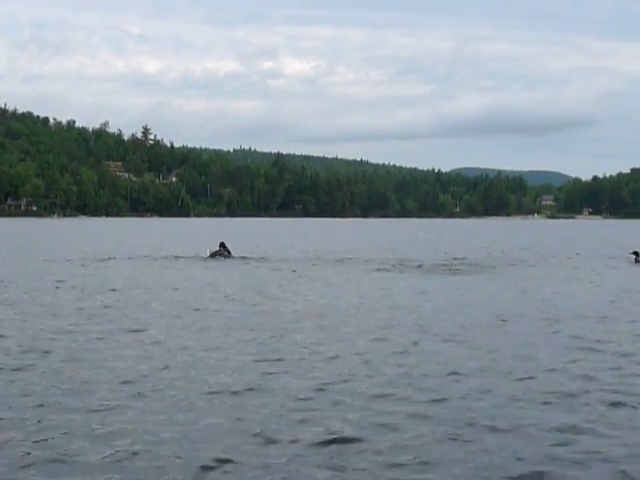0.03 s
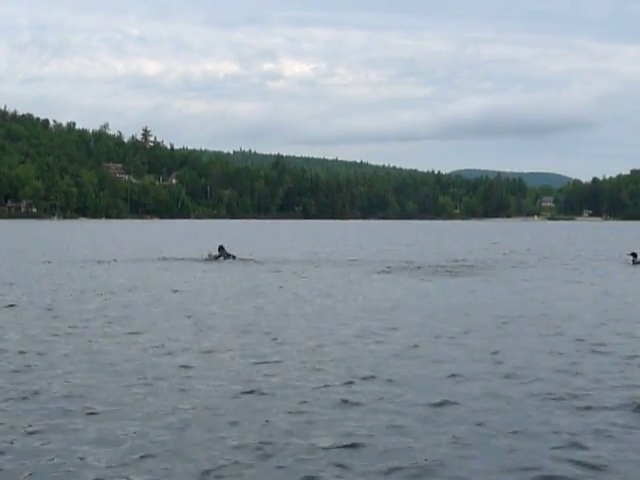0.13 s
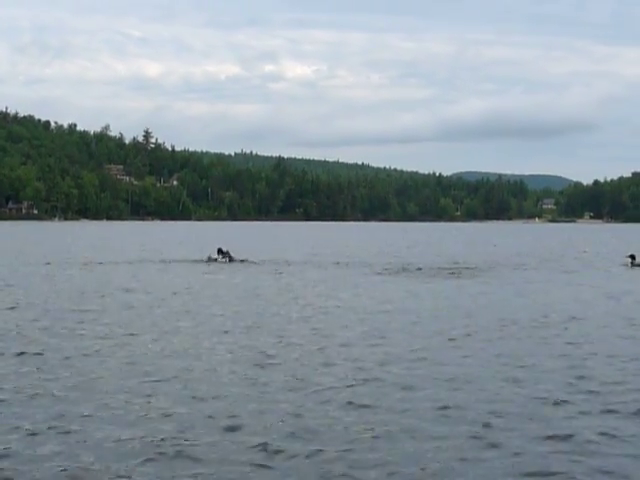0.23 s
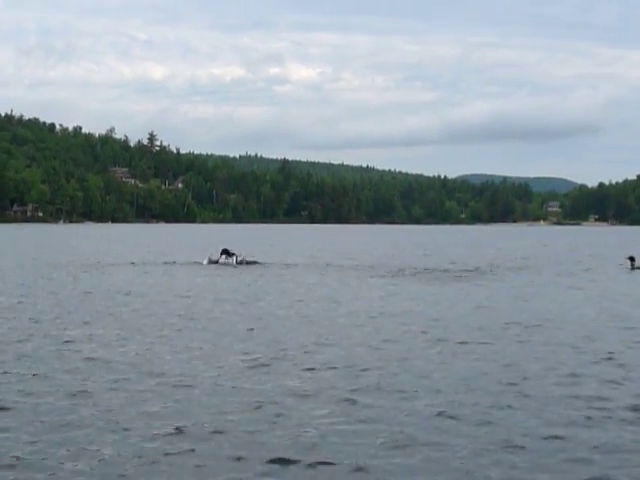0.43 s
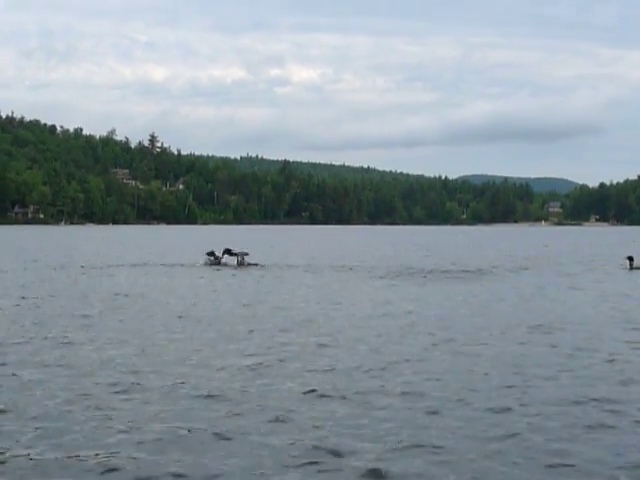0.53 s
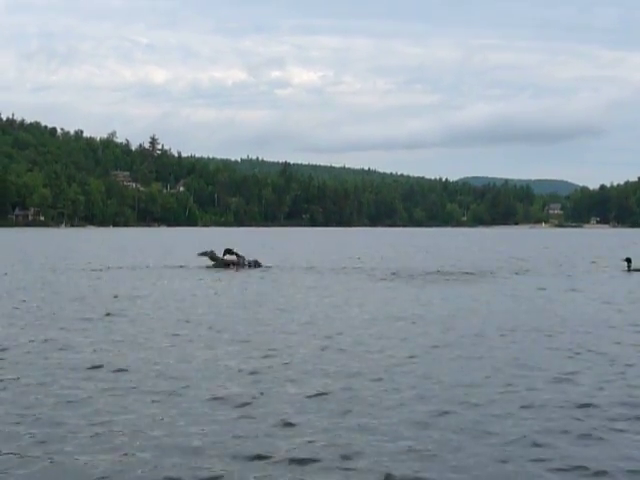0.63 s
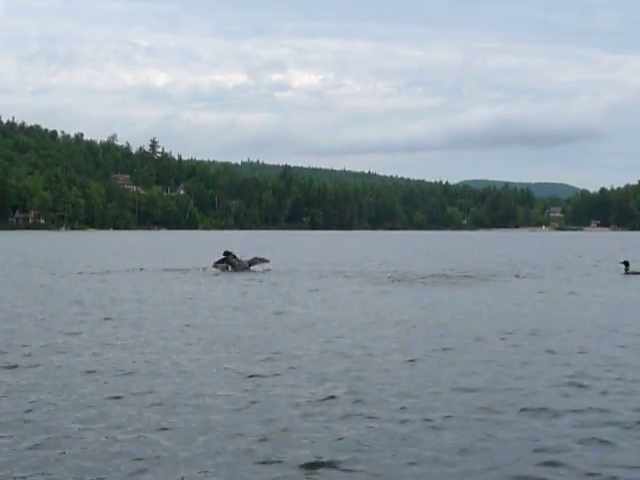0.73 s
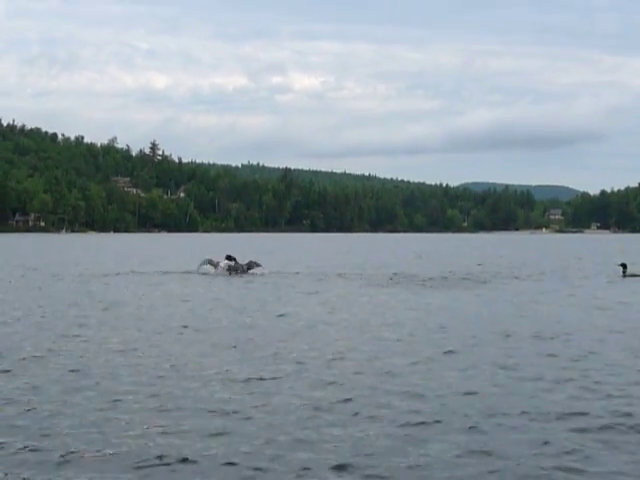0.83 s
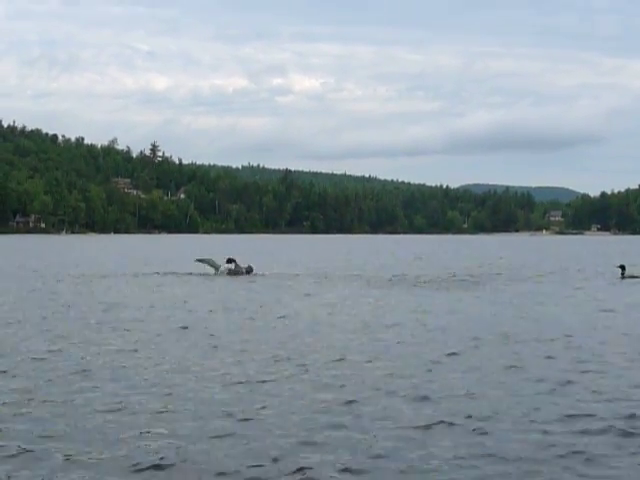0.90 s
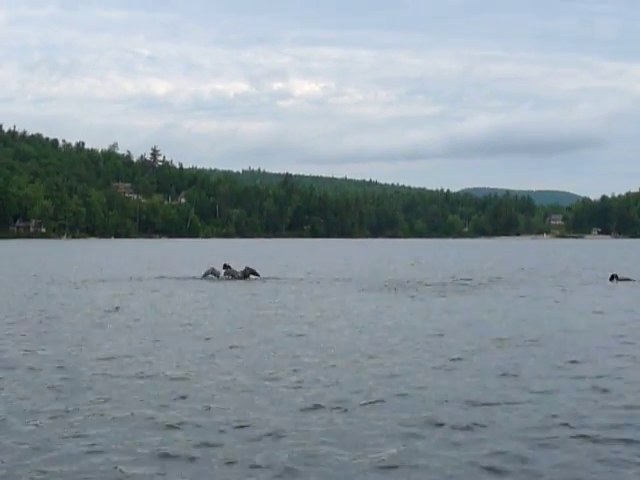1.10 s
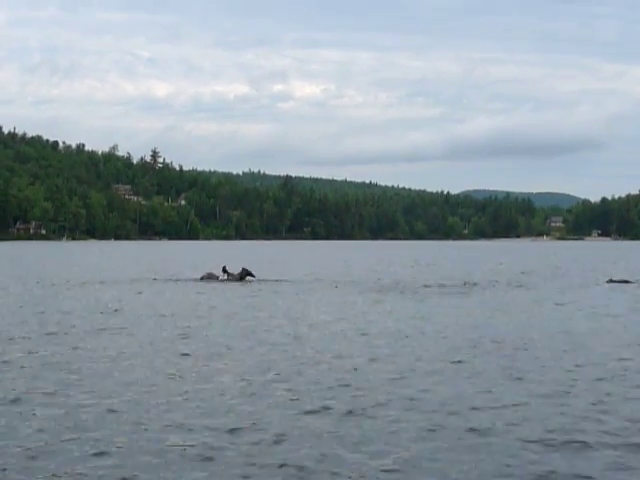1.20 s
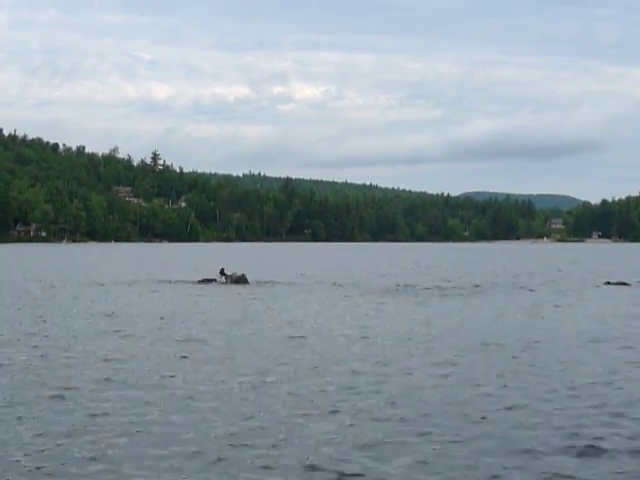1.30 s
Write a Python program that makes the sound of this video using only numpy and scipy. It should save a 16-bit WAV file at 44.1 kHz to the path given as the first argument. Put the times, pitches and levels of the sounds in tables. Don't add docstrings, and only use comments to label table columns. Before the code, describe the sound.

A loon on a wide lake gives one short tremolo, starting low, breaking upward into four or five quick wavers, then fading into a faint smeared echo, over lapping water and low wind puffs on the microphone.

```python
import sys
import numpy as np
from scipy import signal
from scipy.io import wavfile
from scipy.ndimage import uniform_filter1d

SR = 44100
rng = np.random.default_rng(int(sys.argv[2]) if len(sys.argv) > 2 else 0)


def inscribe(sig):
    pcm = np.round(np.clip(np.atleast_2d(sig).T, -1, 1) * 32767)
    wavfile.write(sys.argv[1], SR, pcm.astype(np.int16))


def voltage_ratio(level):
    return 10 ** (np.asarray(level, float) / 20)


N = 59535


def rms_one(x):
    return x / np.sqrt(np.mean(x ** 2) + 1e-20)


def clock():
    return np.arange(N) / SR


def at_hz(points, hz):
    points_hz, points_db = np.transpose(points)
    return np.interp(np.log(hz), np.log(points_hz), points_db)


def cut(x, hz, kind, order=2):
    return signal.sosfilt(signal.butter(order, hz, kind, fs=SR, output="sos"), x)


def drift(rate_hz):
    r = np.exp(-2 * np.pi * rate_hz / SR)
    wander = signal.lfilter([1], [1, -2 * r, r * r], rng.standard_normal(N + SR))
    return rms_one(wander[SR:])


# centre_s, half_length_s, level_db, flutter_db (relative to the thump)
PUFFS = [(.0, 0.013, -33.5, -10.5), (0.031, .014, -32.5, -14), (0.086, 0.0082, -34, -21),
         (0.12, 0.023, -35, -20), (0.216, .012, -31, -29), (0.261, 0.021, -29, -27),
         (0.282, 0.015, -18, -20.5), (0.318, 0.015, -39, -17), (0.339, 0.0079, -32, -12.5),
         (0.412, 0.027, -28.5, -13), (0.443, 0.019, -22.5, -10), (0.483, 0.017, -22, -4.5),
         (0.512, 0.004, -19.5, -9.5), (0.57, 0.022, -31, -12), (0.69, 0.01, -29.5, -5.5),
         (0.749, 0.012, -33, -10), (0.77, 0.0098, -28, -15), (.812, 0.019, -32, -6.5),
         (0.846, 0.011, -41, -10), (1.068, .012, -43, -29), (1.19, 0.0059, -48.5, 2.5),
         (1.345, 0.01, -59.5, -3)]
BUFFETS_PER_S, BUFFET_SPREAD_DB = 220, 2.5
BUFFET_LOW_HZ, BUFFET_HIGH_HZ = 88, 231.5
FLUTTER_HZ, CALM_DB, CALM_FLUTTER_DB = 452, -59.5, -17


def even_out(x):
    power = uniform_filter1d(uniform_filter1d(x ** 2, size=700), size=500)
    return x / np.sqrt(power + 0.22)


def wind():
    centre, half, db, flutter_db = (column[:, None] for column in np.transpose(PUFFS))
    power = voltage_ratio(2 * db) * np.exp(-((clock() - centre) / half) ** 2)
    thump_gain = np.sqrt(power.sum(0) + voltage_ratio(2 * CALM_DB))
    flutter_power = (power * voltage_ratio(2 * flutter_db)).sum(0)
    flutter_gain = np.sqrt(flutter_power + voltage_ratio(2 * (CALM_DB + CALM_FLUTTER_DB)))

    sizes = voltage_ratio(BUFFET_SPREAD_DB * np.minimum(rng.exponential(1, N), 3)) * rng.choice([-1, 1], N)
    hits = sizes * (rng.random(N) < BUFFETS_PER_S / SR)
    hits = hits + 0.0094 * rng.standard_normal(N)
    thump = rms_one(cut(cut(hits, BUFFET_HIGH_HZ, "low", order=4), BUFFET_LOW_HZ, "high"))
    flutter = rms_one(cut(cut(hits, FLUTTER_HZ, "low", order=4), BUFFET_HIGH_HZ, "high"))
    flutter = cut(flutter, 2 * FLUTTER_HZ, "low", order=4)
    return thump_gain * even_out(thump) + flutter_gain * even_out(flutter)


# frequency_hz, density_db (per Hz)
WATER_COLOUR = [(60, 10), (130, 1), (400, -4.5), (800, 0), (1600, -8.5), (2300, -12.5), (3100, -12),
                (4300, -28.5)]
# time_s, level_db
LAPPING = [
    (0, 4.5),
    (.16, -2),
    (.3, -1.5),
    (0.581, 1),
    (.65, -8.5),
    (.69, 7.5),
    (.86, 3.5),
    (0.931, -0.5),
    (1.35, -3.5),
]
WATER_DB, WATER_TOP_HZ = -48.5, 3700


def water(patchy_db=3.0):
    out, together = 0, drift(6.9)
    edges = 60 * 2 ** np.arange(0, 6.6, .5)
    white = rng.standard_normal((2, N))
    for k, (low, high) in enumerate(zip(edges, edges[1:])):
        flicker_db = patchy_db * (low / 60) ** -.2 * (.5 * together + drift(25))
        gain_db = at_hz(WATER_COLOUR, np.sqrt(low * high)) + flicker_db
        out = out + voltage_ratio(gain_db) * cut(white[k % 2], [low, high], "band")
    lapping_db = np.interp(clock(), *np.transpose(LAPPING))
    return voltage_ratio(WATER_DB + lapping_db) * rms_one(cut(out, WATER_TOP_HZ, "low", order=8))


TICK_S = [.08, .4165, .435, .4525, .465, .476, .514, .685, .702, .776, .79, 1.02, 1.068, 1.228]
# peak_db, pitch_hz
TICKS = [(-42, 2800), (-27, 3100), (-39, 2500), (-41, 3000), (-41, 2600), (-39, 2500), (-31, 2100),
         (-41, 2500), (-38, 3200), (-34, 2900), (-34, 2850), (-45, 3200), (-45, 3100), (-46, 3000)]
TICK_T60_S, TICK_TOP_HZ = .009, 3900


def ticks():
    out = np.zeros(N)
    for start, (db, hz) in zip(TICK_S, TICKS):
        age = np.maximum(clock() - start, 0)
        out += voltage_ratio(db - 60 * age / TICK_T60_S) * np.sin(2 * np.pi * hz * age)
    return cut(out, TICK_TOP_HZ, "low", order=6)


def swing(turns):
    s, hz, db, over_db = np.transpose(turns)
    place = np.interp(clock(), s, np.arange(len(s)))
    k = np.minimum(place.astype(int), len(s) - 2)
    curves = []
    for v, roundness in ((hz, 2.9), (db, 4)):
        up = np.clip(np.where(v[k + 1] > v[k], place - k, 1 - place + k), 0, 1)
        rise = 1 - abs(np.cos(up * np.pi / 2)) ** roundness
        curves.append(np.minimum(v[k], v[k + 1]) + abs(v[k + 1] - v[k]) * rise)
    edge_s = .003
    gate = np.clip(np.minimum(clock() - s[0], s[-1] - clock()) / edge_s + 1, 0, 1)
    return curves[0], np.sqrt(2) * voltage_ratio(curves[1]) * gate, np.interp(clock(), s, over_db)


def membrane(parts):
    hz, gain, over_db = np.ones(N), np.zeros(N), np.zeros(N)
    for turns in parts:
        note_hz, note_gain, note_db = swing(turns)
        on = note_gain > gain
        hz = np.where(on, note_hz, hz)
        gain = np.maximum(gain, note_gain)
        over_db = np.where(on, note_db, over_db)
    hz = hz + 3 * drift(60)
    phase = 2 * np.pi * np.cumsum(hz) / SR
    return hz, phase, gain * voltage_ratio(.5 * drift(100)), over_db


# time_s, pitch_hz, level_db, overtones_db
LOW_FIRST = [
    (.342, 693, -36.5, -22),
    (.35, 727.5, -29, -4.5),
    (.368, 755.4, -29.5, -0.5),
    (.405, 683, -24.5, -18.5),
]
LOW_SECOND = [
    (0.41, 731.5, -31.5, -19.5),
    (.424, 753.5, -25.5, 2),
    (0.444, 844.4, -22.5, -10.5),
    (.456, 826, -34.5, -16),
    (.478, 830, -35, -10.5),
]
LOW_THIRD = [
    (.757, 720, -40, -25),
    (.77, 688, -27, -24),
    (.783, 765, -36, -18),
    (.802, 785, -44, -18),
]
LOW_FADE = [
    (.845, 574.5, -42, -22),
    (0.874, 562, -50, -3.5),
    (0.903, 532, -69, -13),
]
# time_s, pitch_hz, level_db, overtones_db
HIGH_RUN = [
    (.443, 1103, -38, 6),
    (.453, 1134, -17, -23.5),
    (.492, 915.2, -25.5, -6),
    (.538, 1176, -16, -12.5),
    (.575, 902.4, -28, 5),
    (.62, 1180, -16, -11),
    (.664, 861.5, -30, 11),
    (.708, 1131, -16, -6.5),
    (.75, 822.5, -30, 8.5),
]
# time_s, pitch_hz, level_db, overtones_db
HIGH_EXTRAS = [
    [(.325, 1016, -49, 8.5), (.342, 996.7, -46.5, 5.5)],
    [(.748, 853.6, -28, -19.5), (.762, 833, -29, -4)],
    [(.782, 1006, -23.5, 0.016), (.8, 1048, -16, 0.016), (.838, 834, -28, 0.0057), (.856, 819, -50, 0.01), (.9, 798, -50, 0.012)],
]
LOW_HARMONICS = [0, 2, -19, -31, -41]
HIGH_HARMONICS = [-1, -32, -37, -54]
# frequency_hz, level_db
THROAT = [(1200, 0), (1600, 0), (2100, 3), (2450, -8), (2800, 9), (3050, 1), (3350, 4), (4500, -6)]
# high_multiple, low_multiple, level_db (relative to the high tone)
MIXED = [(2, -1, -12), (1, 1, -21), (1, 2, -36), (2, 1, -30), (3, -2, -25), (0, 2, -33), (3, -1, -40)]
MIX_FULL_DB = -29
BREATHY_DB, OVERTONE_FLICKER_DB = -52.5, 3


def loon():
    low = membrane([LOW_FIRST, LOW_SECOND, LOW_THIRD, LOW_FADE])
    high = membrane([HIGH_RUN, *HIGH_EXTRAS])
    out = np.zeros(N)
    for (hz, phase, gain, over_db), harmonics in ((low, LOW_HARMONICS), (high, HIGH_HARMONICS)):
        for k, db in enumerate(harmonics, 1):
            overtone_db = (k > 1) * (over_db + OVERTONE_FLICKER_DB * drift(30))
            throat_db = at_hz(THROAT, abs(k * hz) + 1)
            out += gain * voltage_ratio(db + overtone_db + throat_db) * np.sin(k * phase)

    _, low_phase, low_gain, _ = low
    _, high_phase, high_gain, _ = high
    both = high_gain * np.minimum(low_gain / voltage_ratio(MIX_FULL_DB + 3), 1)
    for a, b, db in MIXED:
        out += both * voltage_ratio(db) * np.sin(round(a) * high_phase + round(b) * low_phase)
    air = rms_one(cut(rng.standard_normal(N), [900, 3600], "band"))
    out += voltage_ratio(BREATHY_DB) * (low_gain + high_gain) * air
    return out + ticks()


NEAR_DB, NEAR_T60_S = -21, .15
SHORE_DELAY_S, SHORE_RISE_S, SHORE_T60_S, SHORE_DB = 0.485, .04, 3.5, -30
SHORE_PEAK_HZ, SHORE_WIDTH_HZ, SHORE_BROAD = 1140, 130, .6


def shore(call):
    late = clock() - SHORE_DELAY_S
    rise = np.clip(late / SHORE_RISE_S, 0, 1)
    far = rms_one(rise * voltage_ratio(-60 * late / SHORE_T60_S) * rng.standard_normal(N))
    near = rms_one(voltage_ratio(-60 * clock() / NEAR_T60_S) * rng.standard_normal(N))
    band_hz = SHORE_PEAK_HZ + SHORE_WIDTH_HZ * np.array([-.5, .5])
    trees = SHORE_BROAD * far + cut(far, band_hz, "band")
    echo = voltage_ratio(SHORE_DB) * trees + voltage_ratio(NEAR_DB) * near
    return signal.fftconvolve(call, echo / np.sqrt(N))[:N]


def scene():
    call = loon()
    return (call + shore(call) + water() + wind())[None]


def roll_off(x):
    return signal.sosfilt(signal.butter(12, 8900, fs=SR, output="sos"), x)


def record(dry):
    hiss = voltage_ratio(-66) * rms_one(cut(rng.standard_normal(N), 8750, "low", order=5))
    whine = np.sqrt(2) * voltage_ratio(-78) * np.sin(2 * np.pi * 4388 * clock())
    clip_top = .33
    drive = dry / clip_top
    x = clip_top * np.tanh(drive * (1 + drive ** 2 / 3))
    x = cut(x, 4200, "low", order=6) + hiss + whine
    steep = signal.cheby2(12, 60, 8900, fs=SR, output="sos")
    mix = signal.sosfilt(steep, x) - .011
    return roll_off(mix)


dry = scene()
out = record(dry)
inscribe(out)
```